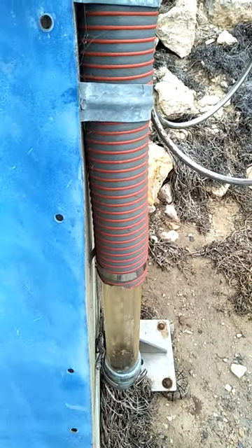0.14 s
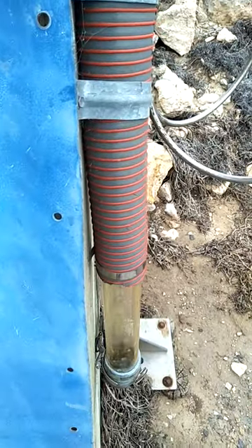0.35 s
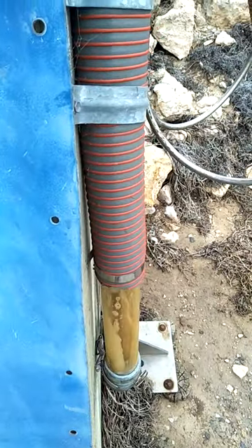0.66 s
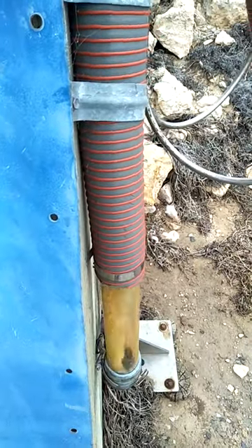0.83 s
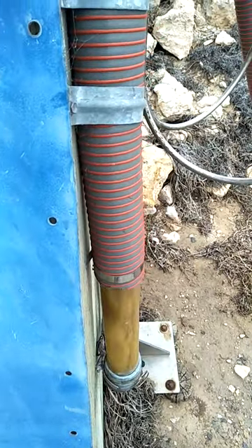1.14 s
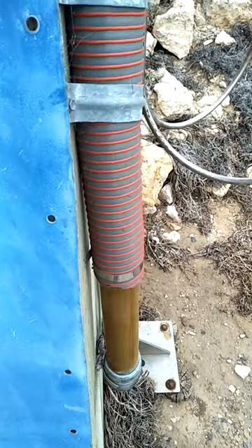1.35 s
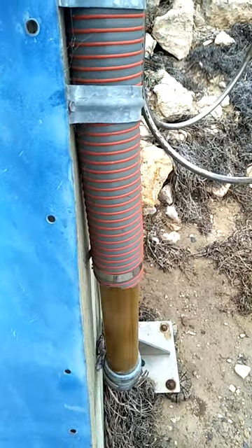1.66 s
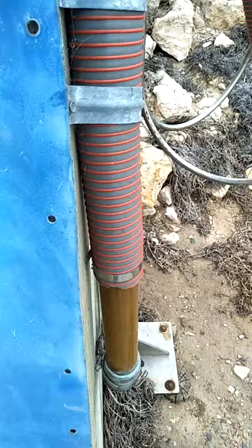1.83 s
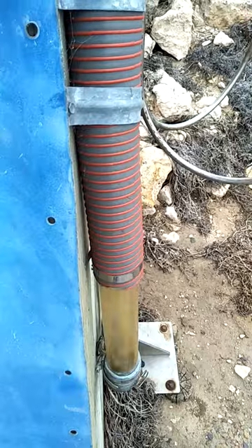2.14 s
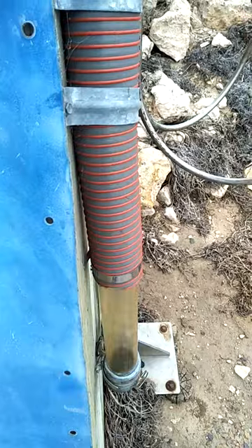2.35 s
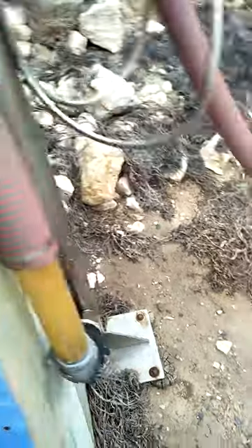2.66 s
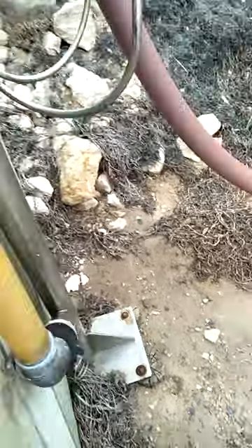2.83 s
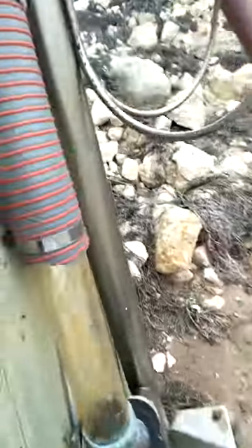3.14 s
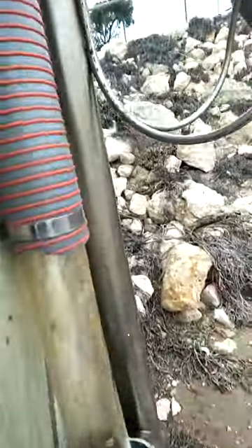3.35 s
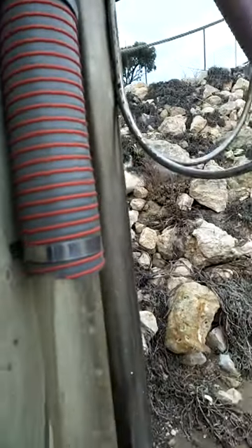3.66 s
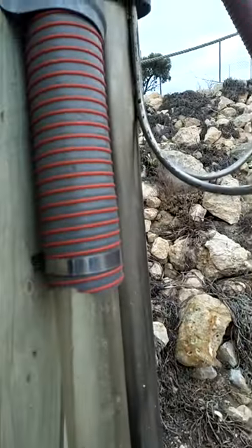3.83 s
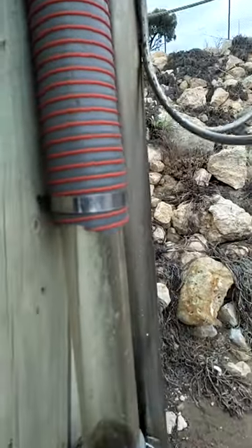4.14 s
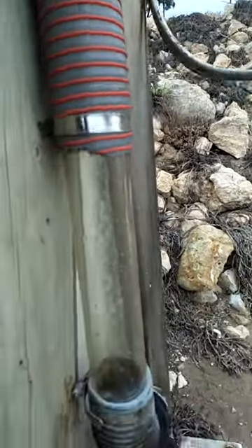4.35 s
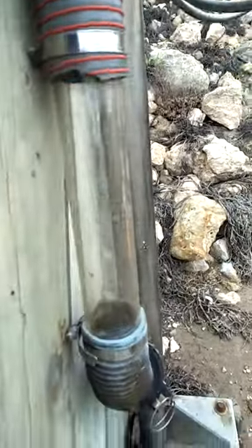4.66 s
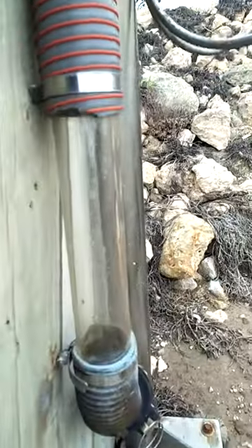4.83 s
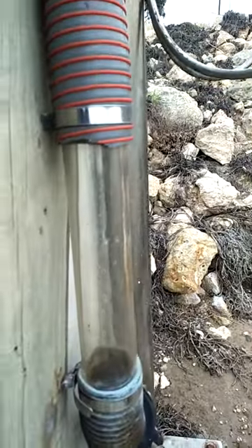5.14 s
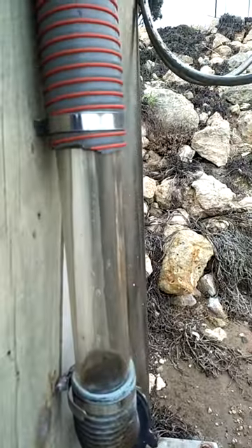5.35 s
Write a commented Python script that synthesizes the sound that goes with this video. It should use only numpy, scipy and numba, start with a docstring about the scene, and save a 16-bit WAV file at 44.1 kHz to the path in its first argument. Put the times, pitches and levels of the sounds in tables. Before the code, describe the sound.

Liquid gurgles and sloshes in surges through a hose and plastic pipe outdoors, with gusts of wind buffeting the microphone.

```python
"""Liquid surges through a ribbed hose and a clear plastic sight pipe, outdoors.
Bursting bubbles excite the pipe's resonant modes, and pockets of trapped air ring as damped
oscillators: deep gulps and higher glugs. The pump whines faintly and the flow hisses. Gusts of
wind shed eddies at the hand-held microphone, which turns towards the pipe midway."""
import sys
import numpy as np
from scipy import signal
from scipy.fft import rfft, irfft, next_fast_len
from scipy.io import wavfile
from numba import njit

SR = 44100
rng = np.random.default_rng(int(sys.argv[2]) if len(sys.argv) > 2 else 0)


def waveform_to_disk(signal):
    """Save audio, clipped to [-1, 1], as 16-bit WAV at the path in sys.argv[1]."""
    frames = np.transpose(np.atleast_2d(signal))
    scaled = np.clip(frames, -1, 1) * 32767
    samples = np.round(scaled).astype(np.int16)
    wavfile.write(sys.argv[1], SR, samples)


N = 242456


def from_db(db):
    """Amplitude ratio of a level in decibels."""
    return 10 ** (np.asarray(db) / 20)


def unit_rms(x):
    """Normalisation to unit mean power."""
    return x / np.sqrt(np.mean(x ** 2) + 1e-20)


def curves(rows):
    """Linear interpolation of each column over the first (time_s), one value a sample."""
    time_s, *columns = np.transpose(rows)
    return [np.interp(np.arange(N) / SR, time_s, column) for column in columns]


def drift(corner_hz):
    """Random modulation: low-passed Gaussian noise of unit spread."""
    hop, settle = 40, 2000
    pole = np.exp(-2 * np.pi * corner_hz * hop / SR)
    noise = rng.standard_normal(N // hop + settle + 2)
    slow = signal.lfilter([1], [1, -2 * pole, pole * pole], noise)[settle:]
    return np.interp(np.arange(N) / hop, np.arange(len(slow)), unit_rms(slow))


def resonance(x, hz, width_hz):
    """Two-pole resonator with unit gain at its peak."""
    r = np.exp(-np.pi * width_hz / SR)
    gain = (1 - r * r) / 2
    return signal.lfilter([gain, 0, -gain], [1, -2 * r * np.cos(2 * np.pi * hz / SR), r * r], x)


@njit
def gliding_resonance(x, hz, width_hz):
    """Time-varying two-pole resonator whose centre follows hz."""
    r = np.exp(-np.pi * width_hz / SR)
    out = np.zeros(len(x))
    for i in range(2, len(x)):
        feedback = 2 * r * np.cos(2 * np.pi * hz[i] / SR) * out[i - 1] - r * r * out[i - 2]
        out[i] = x[i] - x[i - 2] + feedback
    return out


def band(x, low_hz, high_hz, order=2):
    """Butterworth band-pass filter."""
    return signal.sosfilt(signal.butter(order, [low_hz, high_hz], "band", fs=SR, output="sos"), x)


def coloured_noise(spectrum):
    """Spectral shaping of white noise, with levels interpolated over log frequency."""
    hz, level_db = np.transpose(spectrum)
    size = next_fast_len(N)
    log_hz = np.log(np.fft.rfftfreq(size, 1 / SR) + 1)
    gain = from_db(np.interp(log_hz, np.log(hz), level_db))
    return irfft(rfft(rng.standard_normal(size)) * gain, size)[:N]


def swells(steady_db, rows, edge_db, tail):
    """Incoherent addition: each layer's gain sums a steady level and Gaussian swells as power.
    A swell is edge_db down half a length before its centre and falls tail times more slowly."""
    t = np.arange(0, N + 100, 100) / SR
    centre_s, length_s, *levels_db = np.transpose(rows)
    offset = (t - centre_s[:, None]) / length_s[:, None] * 2
    bells = from_db(-edge_db * np.where(offset > 0, offset / tail, offset) ** 2) ** 2
    powers = [np.interp(np.arange(N) / SR, t, from_db(db) ** 2 @ bells) for db in levels_db]
    return [np.sqrt(from_db(db) ** 2 + power) for db, power in zip(steady_db, powers)]


def bubbles(modes, per_s, spread_db, clump_db, rush):
    """Modal excitation: random bursts over a smooth rush drive the pipe's modes, swelling in clumps."""
    onsets = np.flatnonzero(rng.random(N) < per_s / SR)
    count = len(onsets)
    strengths = from_db(spread_db * np.minimum(rng.exponential(1, count), 4)) * rng.standard_normal(count)
    main_mode = rng.integers(0, len(modes), count)
    shared_clumps = drift(17)
    smooth = rush * np.sqrt(np.sum(strengths ** 2) / N / len(modes)) * rng.standard_normal(N)
    out = np.zeros(N)
    for k, (hz, width_hz, level_db) in enumerate(modes):
        drive = smooth.copy()
        drive[onsets] += strengths * np.where(main_mode == k, 1, 0.4)   # bursts leak into other modes
        drive *= from_db(clump_db * (1.17 * shared_clumps + drift(19.7)))
        stage_width_hz = 1.75 * width_hz
        ring = resonance(resonance(drive, hz, stage_width_hz), hz, stage_width_hz)
        out += (-1) ** k * from_db(level_db) * ring
    return unit_rms(out)


# Pipe modes excited by each bubble size: pitch_hz, nominal_width_hz, relative_db
LARGEST_BUBBLE_MODES = [(920, 94, 0.87), (1098, 63, -1.9)]
LARGE_BUBBLE_MODES = [(1270, 84, 3.5), (1390, 84, 3), (1524, 130, 2)]
SMALL_BUBBLE_MODES = [(1760, 305, -2), (1970, 128, 5), (2120, 116, 0), (2308, 128, 0.5), (2536, 227, -4)]
SPRAY_MODES = [(2768, 185, -1), (2920, 310, -0.82), (3203, 300, 0.53), (3522, 270, 0.72)]
# Steady bubbling inside the pipe: time_s, largest_db, large_db, small_db, spray_db
FROTH_LEVELS = [(0.0, -60, -65, -42, -47), (0.44, -58, -49, -37, -41.5), (0.7, -53, -47.5, -44, -46.5),
                (1.01, -57, -60, -49, -52), (1.22, -57, -54, -40.5, -48), (1.55, -46, -36, -53, -49),
                (1.87, -59, -43.5, -47, -47), (2.57, -56.5, -41, -36.5, -40.5),
                (3.08, -39.5, -36.5, -34, -36), (3.25, -46, -40, -18.5, -32.5),
                (3.38, -51, -39, -20.5, -28), (3.61, -49, -33, -22.5, -30), (4.18, -61, -43, -22, -36.5),
                (4.36, -40, -28.5, -24, -43), (4.62, -46, -26, -29.5, -32.5), (4.76, -48, -32, -34, -40),
                (5.11, -51.5, -39.5, -32, -42), (5.5, -48, -36, -38.5, -42.5)]
# Sloshes inside the pipe: centre_s, length_s, largest_db, large_db, small_db, spray_db
SLOSHES = [(0.066, 0.038, -59, -43, -37.5, -52), (0.213, 0.1, -63, -45, -31.5, -39),
           (0.363, 0.025, -49, -34, -52, -42), (0.522, 0.079, -62, -42, -31.5, -42),
           (0.566, 0.092, -52, -34, -36, -41), (0.833, 0.032, -58, -44, -65, -55),
           (0.913, 0.051, -63, -47, -60, -40), (0.978, 0.051, -64, -34.5, -56, -52),
           (1.224, 0.066, -46, -49, -34.5, -37), (1.266, 0.043, -42, -33.5, -38.5, -39),
           (1.398, 0.053, -38, -36, -56, -61), (1.46, 0.06, -45, -35.5, -56, -61),
           (1.565, 0.11, -35.5, -41, -45, -35.5), (1.734, 0.035, -35.5, -35, -44, -42),
           (1.863, 0.045, -62, -34.5, -44, -48), (1.996, 0.052, -58, -38, -52, -57),
           (2.125, 0.06, -43, -39, -36, -36), (2.208, 0.03, -52, -45, -29.5, -42),
           (2.263, 0.083, -58, -41, -30.5, -36.5), (2.376, 0.023, -58, -42, -51, -50),
           (2.447, 0.027, -53, -34, -32, -47), (2.488, 0.12, -55, -52, -30, -40),
           (2.55, 0.043, -51, -32, -35, -44), (2.649, 0.057, -60, -27, -36, -31.5),
           (2.719, 0.033, -55, -43, -30.5, -42), (2.796, 0.087, -40, -36, -27, -52),
           (2.945, 0.029, -49, -50, -32.5, -39), (3.119, 0.11, -35, -25.5, -22, -38),
           (3.177, 0.049, -33, -30, -21, -30), (3.232, 0.043, -44, -22.5, -17.5, -30),
           (3.322, 0.027, -46, -33, -18, -51), (3.389, 0.033, -40, -18, -19, -25),
           (3.47, 0.02, -32, -24, -19.5, -27), (3.549, 0.094, -37, -25.5, -13, -36),
           (3.605, 0.12, -30.5, -18.5, -30, -26), (3.712, 0.032, -52, -42, -27, -25),
           (3.766, 0.075, -34.5, -34, -14.5, -41), (3.847, 0.045, -37.5, -21.5, -19, -38),
           (3.889, 0.062, -34, -25, -23, -38), (3.957, 0.03, -25.5, -21.5, -40, -39),
           (4.044, 0.091, -57, -28, -19.5, -46), (4.127, 0.045, -55, -37, -21.5, -30),
           (4.205, 0.05, -43, -22.5, -24, -40), (4.25, 0.078, -46, -19, -22, -51),
           (4.348, 0.05, -39, -27, -29, -33), (4.405, 0.032, -37, -29, -23.5, -45),
           (4.47, 0.15, -34, -18.5, -22.5, -35), (4.575, 0.059, -33.5, -18.5, -29, -49),
           (4.684, 0.023, -32, -23, -48, -33), (4.732, 0.13, -25, -25, -43, -37),
           (4.786, 0.032, -28, -33, -27, -45), (4.859, 0.026, -33.5, -29, -29, -37),
           (4.962, 0.022, -31.5, -26, -46, -47), (5.003, 0.039, -54, -27, -34, -47),
           (5.077, 0.073, -38.5, -30.5, -25.5, -29.5), (5.143, 0.056, -27.5, -28.5, -41, -40),
           (5.23, 0.096, -42, -30.5, -43, -46), (5.379, 0.046, -43, -28, -34, -39),
           (5.432, 0.028, -43, -29, -48, -50), (5.49, 0.028, -33.5, -32, -31, -40.5)]


def froth():
    """Band-limited radiation: four sizes of bubble surge with the sloshes and sound through the wall."""
    largest, large, small, spray = swells(curves(FROTH_LEVELS), SLOSHES, edge_db=11.5, tail=1.024)
    largest *= bubbles(LARGEST_BUBBLE_MODES, per_s=150, spread_db=3.5, clump_db=2.5, rush=1.01)
    large *= bubbles(LARGE_BUBBLE_MODES, per_s=500, spread_db=3.5, clump_db=1.9, rush=0.67)
    small *= bubbles(SMALL_BUBBLE_MODES, per_s=1800, spread_db=2.5, clump_db=1.6, rush=1.58)
    spray *= bubbles(SPRAY_MODES, per_s=5000, spread_db=2.5, clump_db=1.5, rush=1.0)
    return band(largest + large + small + spray, 940, 3240, order=3)   # the range the wall radiates well


# Whine of the pump: time_s, tone_db, whistle_db
PUMP_LEVELS = [(0, -44, -48), (.6, -44.5, -43), (1, -50.5, -74), (1.5, -45, -44.5), (2, -45, -50.5),
               (2.5, -40, -46), (2.8, -54, -46.5), (3.2, -69, -69), (5.5, -54, -84)]


def pump(tone_hz=1852, whistle_hz=3487, width_hz=89):
    """Random frequency and amplitude modulation makes a thin tone waver; narrow-band noise whistles."""
    tone_db, whistle_db = curves(PUMP_LEVELS)
    phase = 2 * np.pi * np.cumsum(tone_hz + 4 * drift(25)) / SR
    tone = np.sqrt(2) * np.sin(phase) * from_db(2.3 * drift(20))
    breath = resonance(rng.standard_normal(N), whistle_hz, width_hz)
    whistle = unit_rms(resonance(breath, whistle_hz, width_hz)) * from_db(0.86 * drift(37))
    return from_db(tone_db) * tone + from_db(whistle_db) * whistle


# Flow noise spectra, facing away from and towards the pipe: frequency_hz, relative_density_db
AWAY_SPECTRUM = [(180, -39), (300, -38), (720, -8.5), (1000, -18), (1260, -1), (1730, -17), (1810, -26),
                 (2480, -37), (3570, -3), (4810, -15.5), (6060, -13), (8020, -25.5), (12900, -17),
                 (15500, -30)]
FACING_SPECTRUM = [(180, -68), (300, -28.5), (795, -16.5), (1160, -20), (1330, -24), (1760, -18),
                   (2000, -17), (2790, -22), (3880, -5), (5310, -23.5), (6690, -20), (9000, -30),
                   (12300, -30), (15500, -34)]
# Turn of the microphone: time_s, treble_level_db, facing_share (0 to 1)
MICROPHONE_TURN = [(0, -52.5, 0.04), (.7, -49.5, 0.04), (1.5, -48, 0), (2.1, -48.5, 0.16), (2.5, -50, 0.4),
                   (3, -51.5, 0.67), (3.5, -49.5, 0.63), (4.2, -51.5, 0.6), (4.7, -49, 0.98),
                   (5.5, -46, 0.73)]


def flow_hiss():
    """Directivity: broadband flow noise changes colour as the microphone turns towards the pipe."""
    treble_db, facing = curves(MICROPHONE_TURN)
    facing = np.clip(facing, 0, 1)
    noises = coloured_noise(AWAY_SPECTRUM), coloured_noise(FACING_SPECTRUM)
    away, towards = (x / np.std(band(x, 4500, 15500, order=4)) for x in noises)   # equal treble power
    flow = np.sqrt(1 - facing) * away + np.sqrt(facing) * towards
    spray_flicker = (from_db(1.2 * drift(10)) - 1) * band(flow, 3000, 5600)
    return from_db(treble_db + 0.26 * drift(25)) * (flow + spray_flicker)


# Gusts on the microphone: time_s, rumble_db, buffet_db, flutter_db, eddy_pitch_hz
GUSTS = [(0.0, -39.5, -52.5, -61, 99), (0.64, -53, -58, -55.5, 104), (1.22, -58, -55, -55, 138),
         (1.3, -61, -53, -42.5, 212), (1.41, -63, -34, -40.5, 157), (1.55, -55, -34, -38.5, 157),
         (1.81, -62, -39, -46, 220), (2.01, -55, -45, -47, 117), (2.13, -51, -30, -40, 136),
         (2.34, -50, -23, -48, 124), (2.39, -48, -29, -49, 158), (2.62, -42, -26, -55, 111),
         (2.76, -55, -35, -54.5, 129), (3.41, -50, -52.5, -56.5, 111), (3.67, -60, -54, -55.5, 134),
         (3.87, -56, -45, -53, 144), (4.01, -46, -23, -49, 123), (4.13, -39, -25, -42, 136),
         (4.2, -37, -27, -44, 110), (4.27, -29, -24, -44.5, 154), (4.38, -37, -29, -49, 121),
         (4.49, -34, -25.5, -49, 149), (4.7, -58, -45, -57, 140), (4.79, -51, -51.5, -55.5, 130),
         (5.5, -57, -58.5, -60, 133)]
# Strong puffs within the gusts: centre_s, length_s, rumble_db, buffet_db, flutter_db
PUFFS = [(0.02, 0.078, -35, -48, -51.5), (0.11, 0.07, -32, -47, -67), (0.207, 0.023, -33, -48, -71),
         (0.327, 0.06, -37, -51.5, -60), (0.467, 0.074, -44, -47, -61), (0.577, 0.051, -38, -49, -63),
         (0.674, 0.043, -44, -56, -57), (0.877, 0.039, -44, -52, -68), (0.968, 0.04, -48, -54, -59),
         (1.09, 0.06, -45, -45.5, -60), (1.343, 0.08, -58, -40.5, -50), (1.435, 0.046, -53, -28.5, -35.5),
         (1.595, 0.102, -51, -28, -44.5), (1.727, 0.048, -53, -29.5, -43), (1.945, 0.037, -35, -25, -61),
         (2.019, 0.12, -32, -17.5, -56), (2.172, 0.038, -47, -26, -36), (2.23, 0.06, -44, -33, -40),
         (2.314, 0.059, -24.5, -24.5, -57.5), (2.486, 0.025, -38, -15, -48),
         (2.584, 0.102, -32, -19, -38.5), (2.688, 0.061, -27.5, -21.5, -52),
         (2.779, 0.035, -43, -27.5, -59), (2.893, 0.029, -46, -42, -48), (3.077, 0.12, -37, -29.5, -56),
         (3.218, 0.052, -37, -36, -71), (3.853, 0.051, -49, -22.5, -64), (3.946, 0.042, -42, -14.5, -40),
         (4.06, 0.12, -30, -20.5, -41), (4.185, 0.053, -39, -26, -53), (4.348, 0.066, -23, -21, -43),
         (4.475, 0.027, -33, -21, -34.5), (4.609, 0.1, -44, -26.5, -61)]


def wind(eddy_width_hz=68):
    """Vortex shedding at the microphone port: noise in three low bands, the middle pitched by eddy size."""
    *gust_db, eddy_hz = curves(GUSTS)
    rumble_gain, buffet_gain, flutter_gain = swells(gust_db, PUFFS, edge_db=6, tail=1.24)
    lumps = drift(20.6)
    rumble = unit_rms(band(rng.standard_normal(N) * from_db(1.2 * lumps), 20, 69.5))

    buffet_noise = rng.standard_normal(N) * from_db(2.44 * lumps)
    eddies = gliding_resonance(buffet_noise, eddy_hz, eddy_width_hz)
    eddies = band(gliding_resonance(eddies, eddy_hz, eddy_width_hz), 45, 253)
    body = band(buffet_noise, 80.5, 130, order=3)
    buffet = unit_rms(unit_rms(eddies) + 0.51 * unit_rms(body))

    flutter_noise = rng.standard_normal(N) * from_db(2.4 * lumps + 3.2 * drift(21))
    flutter = 0.76 * band(flutter_noise, 232, 690)
    for hz, width_hz, level_db in [(663, 31, -1.5), (444, 24, 1.5), (338, 38, -4.5)]:
        flutter += from_db(level_db) * resonance(flutter_noise, hz, width_hz)
    return rumble_gain * rumble + buffet_gain * buffet + flutter_gain * unit_rms(flutter)


def air_pockets(rows, swell_s, rise_per_s):
    """Damped oscillation: each air pocket swells, rings and dies, rising in pitch as it shrinks."""
    out = np.zeros(N + SR)
    t = np.arange(SR // 5) / SR
    for start_s, peak_db, pitch_hz, t60_s in rows:
        envelope = (1 - np.exp(-t / swell_s)) ** 2 * from_db(-60 * t / t60_s)
        ring = np.sin(2 * np.pi * pitch_hz * (t + rise_per_s * t * t / 2))
        start = round(start_s * SR)
        out[start:start + len(t)] += from_db(peak_db) * envelope / envelope.max() * ring
    return out[:N] * (1 + 0.16 * drift(160))   # the wet, wobbling wall roughens each ring


# Deep gulps of trapped air: start_s, peak_db, pitch_hz, t60_s
GULPS = [(0.296, -40.5, 408, 0.12), (0.549, -39.5, 763, 0.15), (0.804, -43, 730, 0.08),
         (0.873, -40.5, 697, 0.14), (1.227, -41.5, 423, 0.15), (1.495, -34, 320, 0.1),
         (1.878, -30, 670, 0.031), (2.114, -28.5, 705, 0.058), (2.189, -32, 438, 0.17),
         (2.553, -32.5, 331, 0.1), (2.888, -46, 412, 0.067), (3.391, -36.5, 477, 0.041),
         (3.463, -36, 517, 0.045), (3.636, -32.5, 480, 0.064), (3.673, -39.5, 510, 0.066),
         (3.947, -28, 433, 0.052), (3.993, -26, 428, 0.1), (4.459, -37, 343, 0.11), (4.659, -35, 740, 0.13)]


def gulps():
    """Bubble resonance: large pockets of trapped air ring low."""
    return air_pockets(GULPS, swell_s=0.0013, rise_per_s=1.08)


# Single loud glugs: start_s, peak_db, pitch_hz, t60_s
GLUGS = [(0.36, -23.5, 1700, .019), (1.255, -25.5, 1410, .03), (1.4, -21, 1210, 0.02),
         (1.489, -23, 1270, .024), (1.511, -24, 1270, .03), (1.545, -23, 1300, .03),
         (1.853, -26, 1280, 0.065), (2.123, -26, 1580, .043), (2.424, -25, 1880, .034),
         (2.48, -14.5, 1850, .021), (2.621, -22, 1326, 0.056), (2.648, -21, 1302, 0.068),
         (2.76, -23, 1270, 0.047), (2.949, -21, 1750, 0.032), (3.165, -10.5, 1877, .049),
         (3.197, -10, 2040, 0.06), (3.228, -14, 1890, .036), (3.31, -17, 1900, .03),
         (3.373, -14, 1970, .027), (3.435, -21, 1460, .03), (3.47, -6, 2013, .022), (3.496, -18, 2290, .03),
         (3.627, -17, 1360, .023), (3.696, -10, 2240, .026), (3.763, -8.5, 1970, 0.024),
         (3.813, -16, 2010, .053), (3.901, -8.5, 2010, .019), (3.995, -10, 1970, 0.016),
         (4.026, -12, 1967, .079), (4.103, -18, 2120, .038), (4.247, -13.5, 1960, 0.069),
         (4.332, -14, 2010, 0.036), (4.355, -20, 1570, 0.04), (4.561, -12, 1360, 0.017),
         (4.784, -18, 1430, .044), (4.836, -18.5, 1810, 0.041), (4.958, -24, 1390, .028),
         (4.998, -23, 1266, .059), (5.049, -20.5, 1366, 0.077), (5.075, -10.5, 2004, 0.031),
         (5.123, -21, 1310, .024), (5.322, -21, 1970, .017), (5.354, -16.5, 1970, 0.041),
         (5.375, -16.5, 1350, 0.034), (5.433, -20, 1312, 0.072)]


def glugs():
    """Bubble resonance: smaller pockets ring higher and mostly decay sooner."""
    return air_pockets(GLUGS, swell_s=0.00069, rise_per_s=1.64)


def scene():
    """Superposition of liquid, pump, flow noise and wind at one microphone."""
    liquid = froth() + glugs() + gulps()
    return (liquid + pump() + flow_hiss() + wind())[None]


def record(dry):
    """Band limiting: a steep elliptic low-pass removes the highest treble."""
    cutoff_hz = 15680
    return signal.sosfilt(signal.ellip(12, 0.3, 75, cutoff_hz, fs=SR, output="sos"), dry)


dry = scene()
out = record(dry)
waveform_to_disk(out)
```